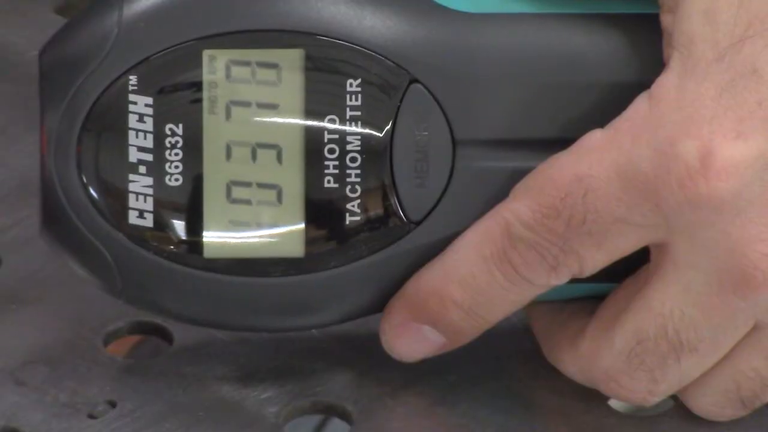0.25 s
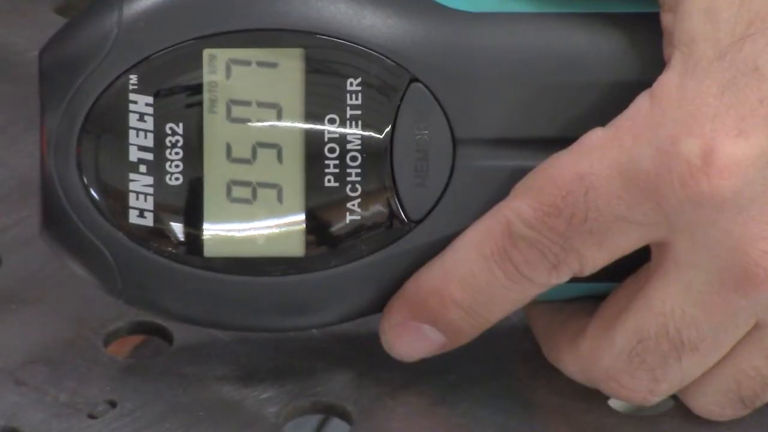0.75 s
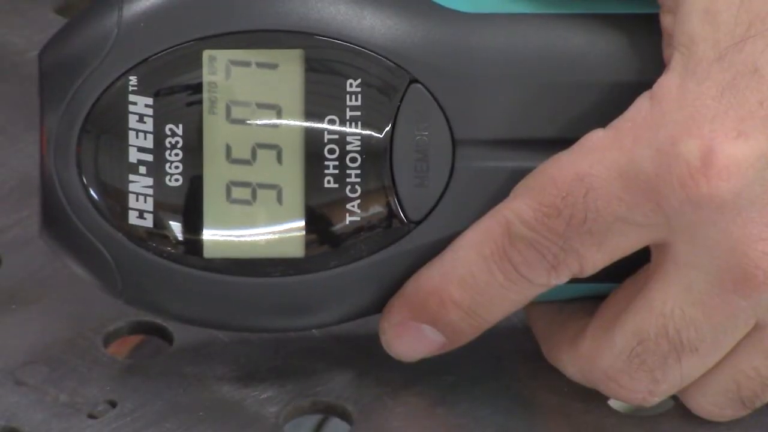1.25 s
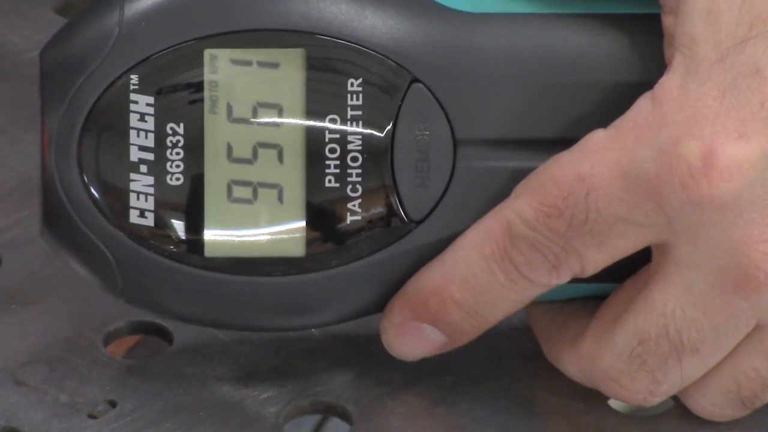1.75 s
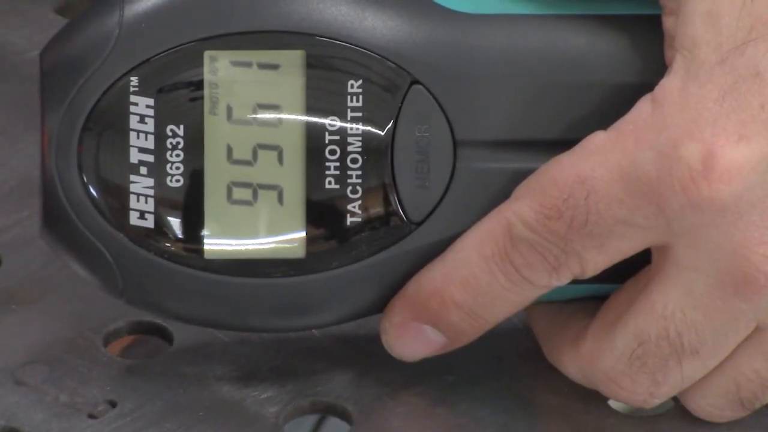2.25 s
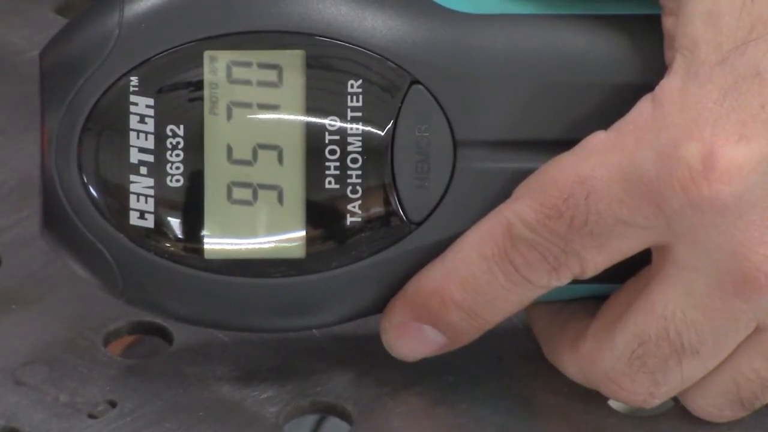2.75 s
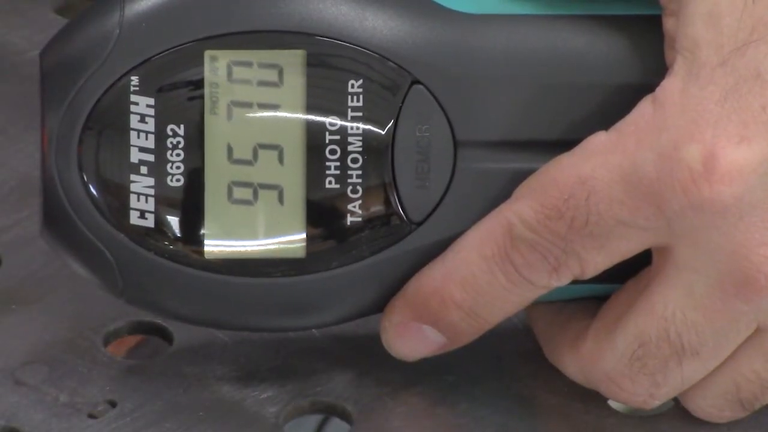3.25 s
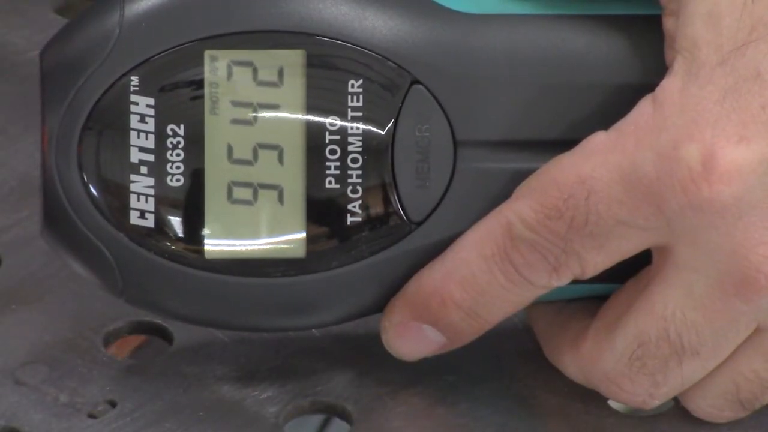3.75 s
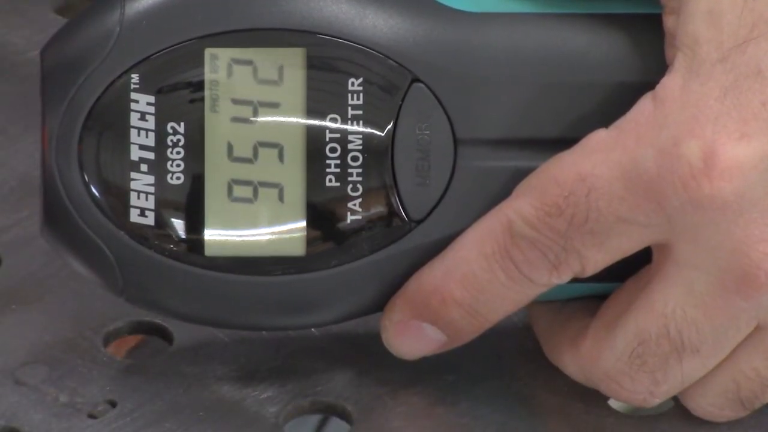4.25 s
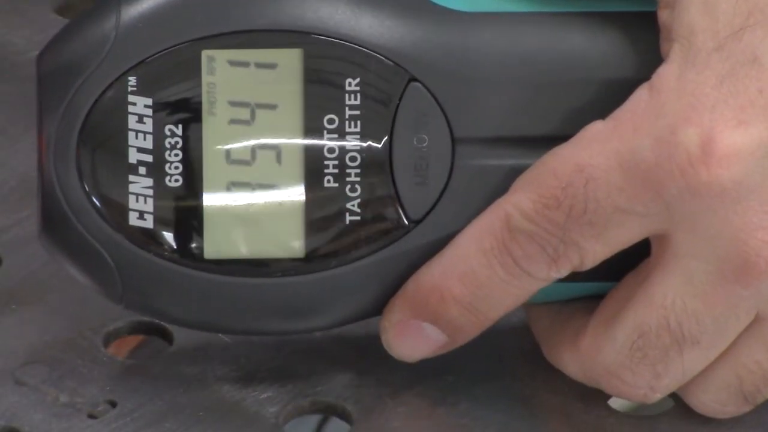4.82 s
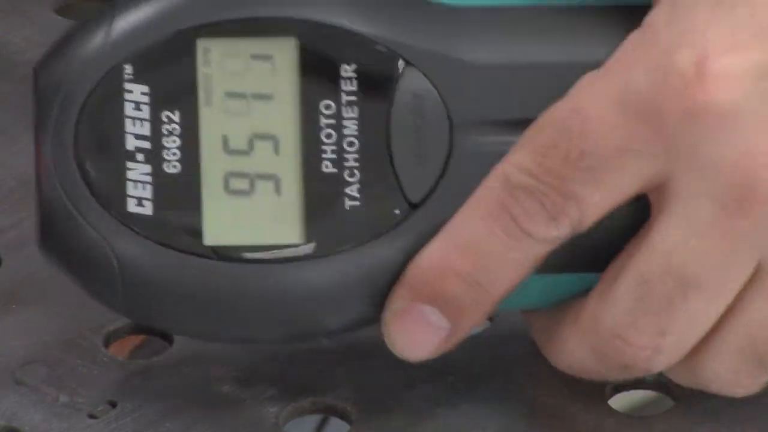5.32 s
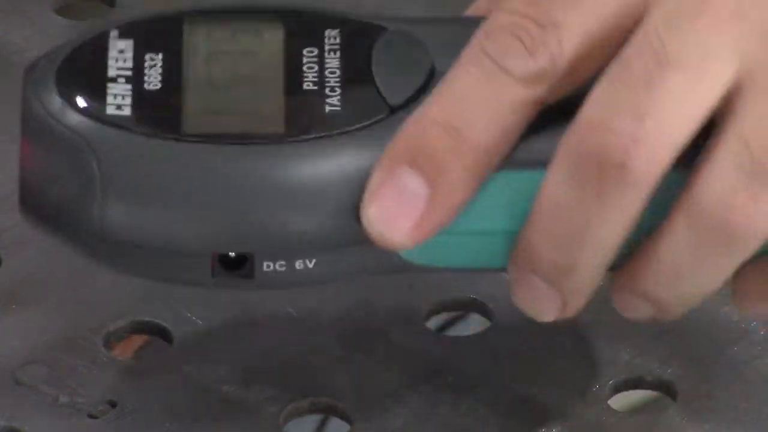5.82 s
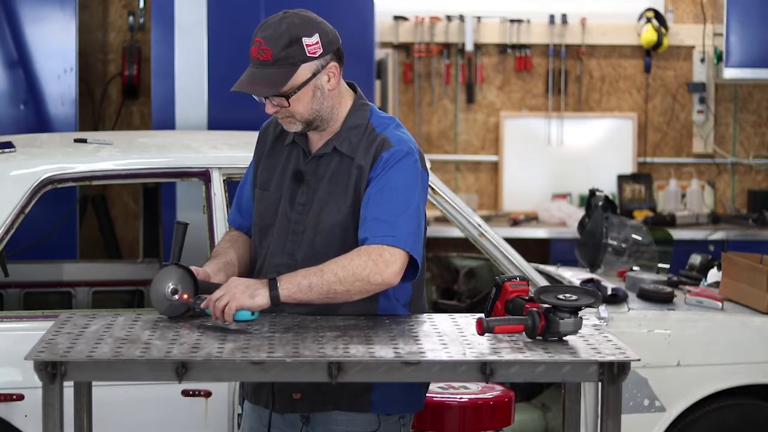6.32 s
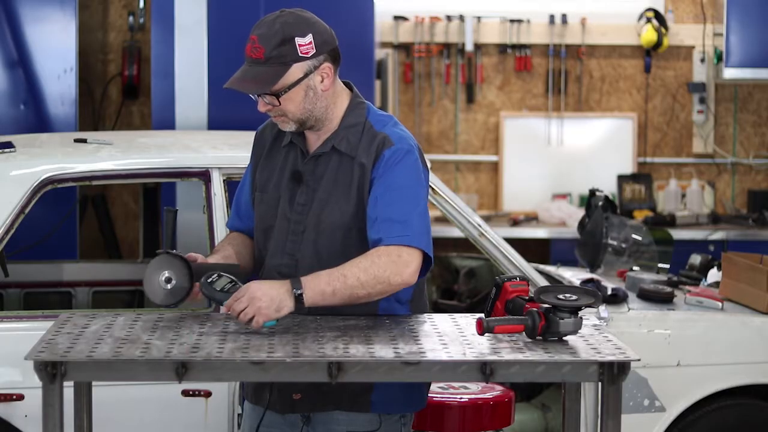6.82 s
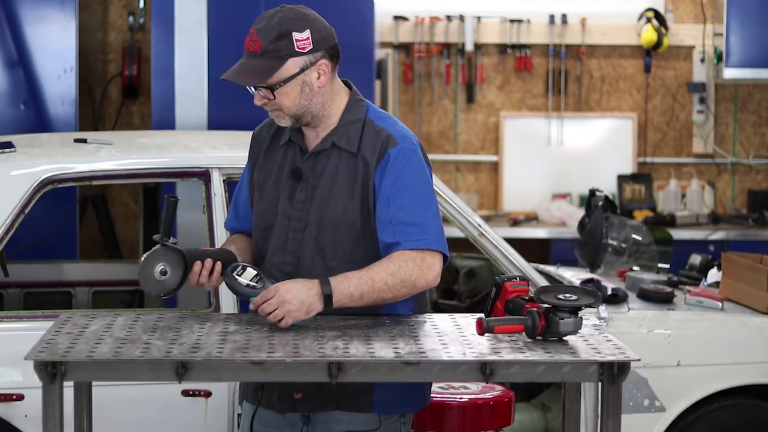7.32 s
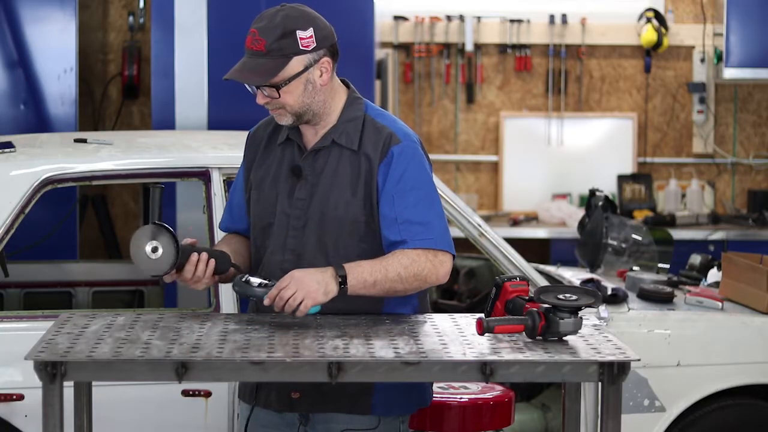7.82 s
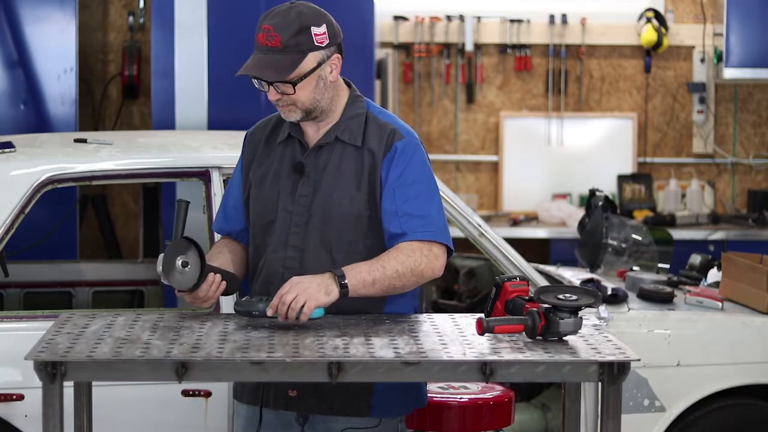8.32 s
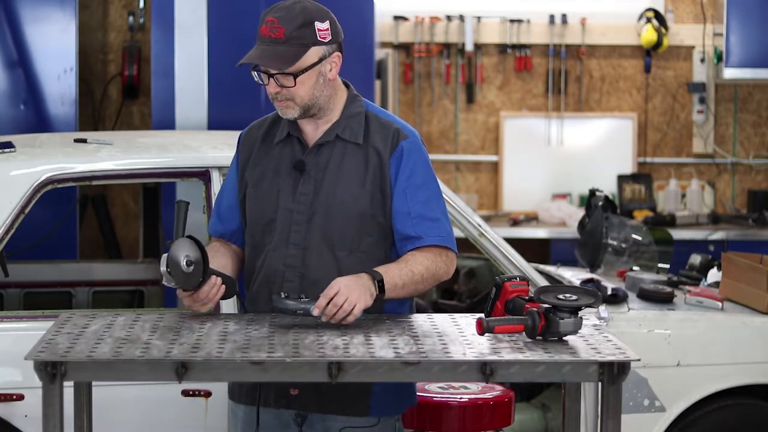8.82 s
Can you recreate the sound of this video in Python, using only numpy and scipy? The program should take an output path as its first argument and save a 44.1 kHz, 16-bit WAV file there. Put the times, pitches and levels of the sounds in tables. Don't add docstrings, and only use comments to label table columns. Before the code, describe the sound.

A hand-held angle grinder runs free over a steel bench in a garage, a steady mid-pitched whine inside a loud, gritty rush of fan air and gear chatter. Turning it changes the colour of the rush, and lifting darkens it. The switch clicks off, the pitch slides down, and dry gear knocks tick through the fading whir. Close clip-on microphone, left channel only.

```python
import sys
import numpy as np
from scipy import signal
from scipy.fft import rfft, irfft, next_fast_len
from scipy.io import wavfile
from scipy.ndimage import map_coordinates

SR = 44100
rng = np.random.default_rng(int(sys.argv[2]) if len(sys.argv) > 2 else 0)


def wav_record(signal):
    frames = np.transpose(np.atleast_2d(signal))
    bounded = np.clip(frames, -1, 1)
    quanta = np.round(bounded * 32767).astype(np.int16)
    wavfile.write(sys.argv[1], SR, quanta)


def convert_level_to_amplitude(level_db):
    exponent = np.asarray(level_db, float) / 20
    return 10 ** exponent


N = 399987

# (start [s], length [s])
MOVES = [
    (4.1, 0.37),
    (6.65, 0.35),
    (7.72, 0.59),
]
# (time [s], rotation rate [Hz])
SPEED = [(0, 490.3), (.3, 490.3), (1.25, 493.3), (2.2, 490.3), (3.9, 490.3), (4.75, 492.2), (6.25, 494),
         (7.25, 495), (7.45, 494.8)]
COAST = (-.00975, -.0656, -.6413, 0)
FORCE_ORDERS = [34, 68, 22, 44, 11]
# (flat [dB], turned [dB], lifted [dB], lowered [dB])
FORCES = [(-42.5, -41.5, -41.5, -44), (-53.5, -57.5, -50, -61), (-57.5, -57.5, -51.5, -65),
          (-61, -55.5, -64.5, -51), (-54, -52, -53, -57)]
# (phase drift [rad], level sway [dB])
UNSTEADY = [(.1, 0.48), (.15, 2), (.3, 2.5), (.3, 4), (.34, 4)]
# (frequency [Hz], level [dB])
HOUSING = [(150, -20), (200, -5), (240, 2), (450, 5.5), (500, -0.1), (640, -3), (820, -8), (985, -2.5)]
# (frequency [Hz], width [Hz], depth [dB])
DEAD = [(307.4, 12.7, -12), (258, 6.3, -8), (217, 6.2, -8), (388, 19, -2)]
# (rotor order, level [dB])
ORDERS_ON = [(11, -60.5), (12, -59.5), (13, -56), (24, -72)]
CROSSING_ORDERS = [5, 6, 55 / 34, 66 / 34, 77 / 34, 24.9, 3, 4]
# (peak level [dB], frequency [Hz], width [Hz])
CROSSING = [(-40.5, 2100, 220), (-47.5, 2150, 350), (-63, 380, 83), (-68, 350, 110), (-68, 330, 110),
            (-69, 6300, 1500), (-55, 990, 46), (-55, 996, 43)]
# (frequency [Hz], level [dB])
VENTS = [(7600, -84), (8600, -64), (9400, -66), (10200, -57), (11000, -66), (12000, -61), (15000, -62),
         (16500, -85)]
# (frequency [Hz], level [dB])
FLAT = [(530, -29), (900, -14), (955, -4.5), (1160, 3), (1670, 1), (2450, -9.5), (2760, 2.5), (3510, -7),
        (5790, -3), (6370, -6), (8590, -18.5), (10800, -9), (12400, -9.5), (14500, -15.5), (15600, -21)]
TURNED = [(530, -58), (900, -13.5), (967, -21.5), (1230, -5.5), (2150, -0.5), (2800, -6.5), (3470, -3),
          (3950, -7.5), (5020, -5.5), (5860, -11.5), (6450, -7.5), (8690, -14), (10900, -9), (14500, -13.5),
          (15600, -23)]
LIFTED = [(530, -49), (900, -18), (967, -15), (1200, -16.5), (1500, -11.5), (2130, 0), (2800, -12),
          (3550, -7.5), (3950, -10.5), (5270, -13), (8390, -21.5), (9340, -17), (10300, -24), (12100, -21),
          (15600, -33)]
LOWERED = [(530, -33), (900, -11), (990, -6), (1140, -19), (2000, 3.5), (2390, -2), (2800, -14), (3550, -3),
           (4150, -13.5), (5080, -9.5), (5860, -22), (6450, -13), (9910, -26), (12100, -25), (15600, -40)]
BLEND = [(.72, 0.053, .15, 0.079), (0.035, 0.9, 0.033, .02), (0.0083, .01, 1, 0.011), (.01, .1, .02, 0.84)]
# (time [s], level [dB])
NEAR = [(0, 0.16), (4.05, -0.1), (4.27, 1.3), (4.7, 0.97), (6.75, 1.26), (7.12, 3.5), (7.4, 1), (7.78, 2),
        (7.88, 4.5), (8.0, 3), (8.3, 1.5), (8.45, 1), (8.9, 1), (9.07, 1.5)]
DISC_HZ = [990, 2750, 4168, 6300, 7640, 10510, 12070]
# (width [Hz], level [dB])
DISC = [(14, -7.5), (149, -76), (50, -6.5), (80, -12), (35, -25), (64.815, -5), (130, -7)]
# (frequency [Hz], level [dB])
CHATTER = [(600, -47), (1500, -17), (3000, -7.5), (4500, -4.5), (5800, -1), (7500, -3.5), (11000, -6),
           (15000, -4)]
# (time [s], peak level [dB], brightness [dB])
SWITCH = [
    (7.428, -28, -5),
    (7.447, -32, -8),
]
# (time [s], peak level [dB], brightness [dB])
KNOCKS = [(7.863, -27, -21), (8.053, -30, -14), (8.111, -30, -14), (8.161, -29, -15), (8.1865, -33, -21),
          (8.212, -28, -18), (8.2528, -28, -19), (8.3157, -31, -14), (8.3541, -33, -16),
          (8.395, -30.5, -19), (8.4249, -35, -21), (8.4664, -32, -20), (8.4838, -33, -23),
          (8.522, -32, -17), (8.5436, -44, -14), (8.575, -32, -13), (8.6005, -36, -19), (8.622, -32.5, -19),
          (8.634, -30, -21), (8.6848, -31.5, -19), (8.7118, -36, -20), (8.7437, -35, -14),
          (8.7895, -28, -26), (8.826, -36, -19), (8.862, -37, -18), (8.886, -31.5, -22),
          (8.9317, -33.5, -20), (8.9582, -34, -24), (8.993, -37, -20), (9.026, -34, -21)]
# (frequency [Hz], level [dB])
RUMBLE = [(50, -12), (100, -8.5), (160, -7.5), (250, -5.5), (330, -3), (440, 1), (600, -1), (800, -2.5),
          (920, -23), (1000, 3), (1200, -62)]
# (time [s], delay [ms], strength [0-1])
ECHO = [(4.08, .63, .09), (4.14, .79, .15), (4.35, .69, .33), (4.55, .672, .16), (5.3, .686, .26),
        (5.9, .683, .35), (6.65, .684, .3), (6.9, .697, .16), (8.5, .7, .17), (9.07, .74, .35)]
# (frequency [Hz], level [dB])
GARAGE = [(15, 4), (30, 3), (60, 0.5), (120, -18.5), (300, -9.5), (1000, -7), (4000, -13.5), (16000, -22)]

OFF_S = 7.45
BLADES = 36.86
SPINDLE = 11 / 34
TIME_S = np.arange(N) / SR
COASTING_S = np.clip(TIME_S - OFF_S, 0, None)


def unit(x):
    return x / np.sqrt(np.mean(x ** 2) + 1e-20)


def along(points, hz):
    f, value = np.transpose(points)
    return np.interp(np.log(hz + 1), np.log(f + 1), value)


def curves(rows):
    s, *columns = np.transpose(rows)
    return [np.interp(TIME_S, s, column) for column in columns]


def wobble(rate):
    knots = rng.standard_normal(int(N * rate / SR) + 4)
    return np.interp(np.arange(N) * rate / SR, np.arange(len(knots)), knots)


def filtered(x, response):
    m = next_fast_len(N + 8192, True)
    gain = response(np.fft.rfftfreq(m, 1 / SR)).astype(np.complex64)
    return irfft(rfft(x, m) * gain, m)[..., :N]


def noise_through(points):
    return unit(filtered(rng.standard_normal(N), lambda f: convert_level_to_amplitude(along(points, f))))


def tone(turns, db, drift, sway_db):
    level = np.sqrt(2) * convert_level_to_amplitude(db + sway_db * wobble(25))
    return level * np.sin(2 * np.pi * turns + drift * wobble(30))


def bursts(times, sizes, rise, fall):
    marks = np.bincount(np.round(times * SR).astype(int), sizes, N + SR)[:N]
    t = np.arange(-200, 900) / SR
    shape = np.where(t < 0, np.exp(-.5 * (t / rise) ** 2), np.exp(-np.abs(t) / fall))
    return signal.oaconvolve(marks, shape)[200:N + 200]


def halves(f):
    return 1 / (1 + (f / 7000 + 1e-9) ** np.array([[8], [-8]]))


def poses():
    done = [np.clip((TIME_S - start) / length, 0, 1) for start, length in MOVES]
    since_turn = np.clip(TIME_S - MOVES[0][0], 0, None)
    done[0] = done[0] * (1 - 0.31 * np.exp(-since_turn / 1.4))
    return -np.diff([np.ones(N)] + done + [np.zeros(N)], axis=0)


def rotation():
    slowed = np.polyval(COAST, COASTING_S)
    hz = curves(SPEED)[0] * np.exp(slowed)
    return hz, np.cumsum(hz) / SR, slowed


def rotor_whine(hz, turns, slowed, shares):
    force_db = np.array(FORCES) @ shares + 20.5 * slowed
    force_db[1] -= 2 * (COASTING_S > 0) * shares[2]
    x = np.zeros(N)
    for order, db, (drift, sway_db) in zip(np.array(FORCE_ORDERS) / 34, force_db, UNSTEADY):
        f = order * hz
        housing_db = along(HOUSING, f)
        for dead_hz, width, depth_db in DEAD:
            housing_db = housing_db + depth_db * np.exp(-.5 * ((f - dead_hz) / width) ** 2)
        x += tone(order * turns, db + housing_db, drift, sway_db)
    return x


def powered_lines(turns):
    power_db = np.where(COASTING_S > 0, -40, 0)
    return sum(tone(round(order) * turns, db + power_db, drift=0.61, sway_db=-4.5) for order, db in ORDERS_ON)


def resonance_crossings(hz, turns):
    x = np.zeros(N)
    for order, (db, peak_hz, width_hz) in zip(CROSSING_ORDERS, CROSSING):
        response = 1 / (1 + (2 * (order * hz - peak_hz) / width_hz) ** 2)
        x += (COASTING_S > 0) * response * tone(order * turns, db, drift=0.43, sway_db=3.5)
    return x


def fan_whistle(hz, turns):
    whistle_db = along(VENTS, BLADES * hz)
    sideband = tone((BLADES - 1) * turns, whistle_db - 9, drift=.3, sway_db=2.5)
    return sideband + tone(BLADES * turns, whistle_db, drift=.25, sway_db=2.5)


def gear_chatter():
    draw = rng.standard_normal((900, 5))
    times = np.cumsum(.015 * np.exp(.25 * draw[:, 0]))
    size_db = 1.1 * np.tanh(draw[:, 1]) - 40 * np.clip(times - OFF_S, 0, 2)
    on = times < 8
    contacts = []
    for own in draw[:, 2:].T:
        sizes = convert_level_to_amplitude(size_db + 2.7 * np.tanh(own))
        contacts.append(unit(bursts(times[on], sizes[on], rise=0.0011, fall=0.0022)))

    def zones(f):
        bands = np.array([f < 3800, (f >= 3800) & (f < 8200), f >= 8200])
        return convert_level_to_amplitude(along(CHATTER, f)) * bands

    noise = rng.standard_normal(N) * np.array(contacts)
    return filtered(noise.astype(np.float32), zones).sum(axis=0)


def load_beat(turns):
    mains = 0.019 * np.cos(2 * np.pi * 120 * TIME_S) * (np.arange(N) < OFF_S * SR)
    spindle = 0.05 * np.cos(2 * np.pi * SPINDLE * turns)
    return 1 + mains + spindle + 0.092 * np.cos(2 * np.pi * turns)


def disc_response(f):
    ring = 1
    for mode_hz, (width, db) in zip(DISC_HZ, DISC):
        damping = 1j * f * width
        ring = ring + convert_level_to_amplitude(db) * damping / (mode_hz * mode_hz - f * f + damping)
    return ring


def rush(turns, slowed, shares):
    near_db = curves(NEAR)[0]
    air_db = -37 + 1.06 * near_db + 15.8 * slowed
    brush_loss_db = 3 * (1 - np.exp(-COASTING_S / 0.29))
    hiss_db = -45 + near_db + 17 * slowed - brush_loss_db
    air = rng.standard_normal(N) * convert_level_to_amplitude(0.52 * wobble(40))
    drive = load_beat(turns) * (air + convert_level_to_amplitude(0.5) * gear_chatter())
    rung = filtered(drive, disc_response).astype(np.float32)
    out = np.zeros(N)
    for share, colour in zip(np.transpose(BLEND) @ shares, (FLAT, TURNED, LIFTED, LOWERED)):
        body, top = filtered(rung, lambda f: convert_level_to_amplitude(along(colour, f)) * halves(f))
        out += np.clip(share, 0, 1) * (convert_level_to_amplitude(air_db) * unit(body) + convert_level_to_amplitude(hiss_db) * unit(top))
    return out


def knocks():
    s, db, bright_db = np.transpose([*SWITCH, *KNOCKS])
    knock = bursts(s + 0.0016, convert_level_to_amplitude(db), rise=0.0016, fall=0.005)
    bright = bursts(s + 0.0009, convert_level_to_amplitude(db + bright_db), rise=0.0012, fall=0.0045)

    def steel_colour(f):
        return convert_level_to_amplitude(along(LOWERED, f) + 0.49 * along(CHATTER, f)) * halves(f)

    steel, edge = filtered(rng.standard_normal(N), steel_colour)
    return convert_level_to_amplitude(-9.5) * knock * unit(steel) + convert_level_to_amplitude(-0.5) * bright * unit(edge)


def rumble(slowed):
    db = -49.5 + .15 * curves(NEAR)[0] + 16 * slowed
    return convert_level_to_amplitude(db + wobble(7.4)) * noise_through(RUMBLE)


def bench_echo(x):
    lag_ms, strength = curves(ECHO)
    echo = map_coordinates(x, [np.arange(N) - lag_ms * SR / 1000], order=3)
    return (x - strength * echo) / np.sqrt(1 + strength ** 2)


def garage_hum():
    return convert_level_to_amplitude(-58.5) * noise_through(GARAGE)


def scene():
    shares = poses()
    hz, turns, slowed = rotation()
    left = rotor_whine(hz, turns, slowed, shares) + powered_lines(turns)
    left += resonance_crossings(hz, turns) + fan_whistle(hz, turns)
    left += bench_echo(rush(turns, slowed, shares) + knocks())
    left += rumble(slowed) + garage_hum()
    return np.array([left, np.zeros(N)])


def low_pass(x):
    return signal.sosfilt(signal.butter(12, 15765, fs=SR, output="sos"), x)


def record(dry):
    return low_pass(2 * dry)


dry = scene()
out = record(dry)
wav_record(out)
```